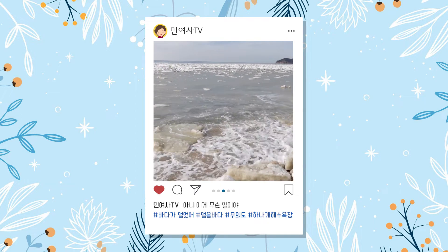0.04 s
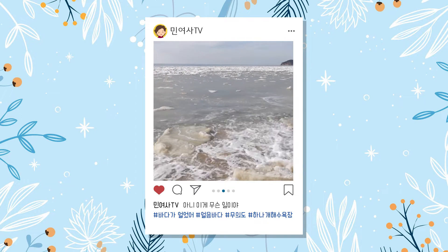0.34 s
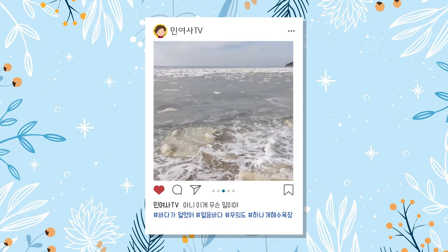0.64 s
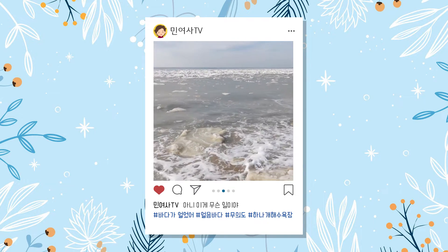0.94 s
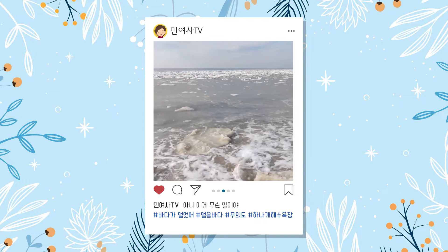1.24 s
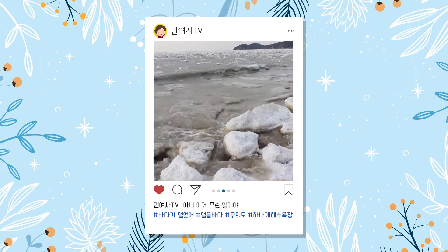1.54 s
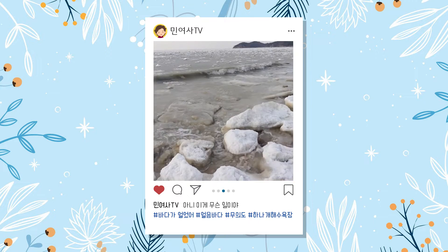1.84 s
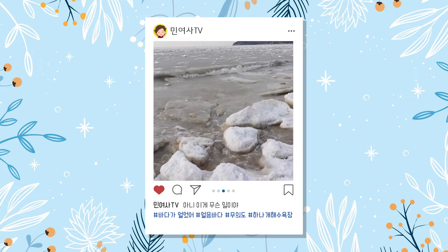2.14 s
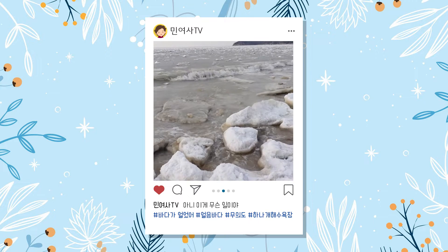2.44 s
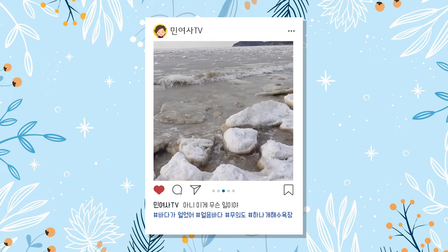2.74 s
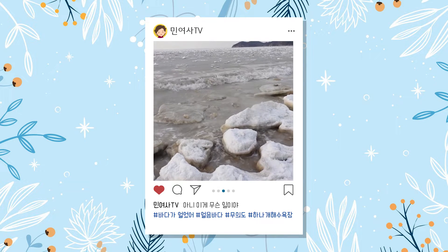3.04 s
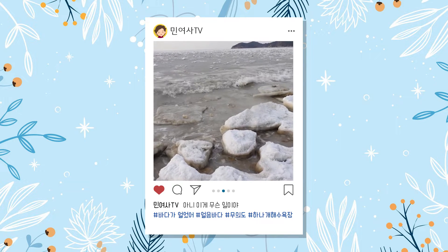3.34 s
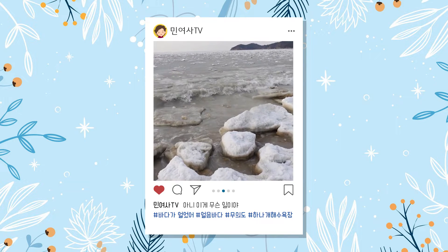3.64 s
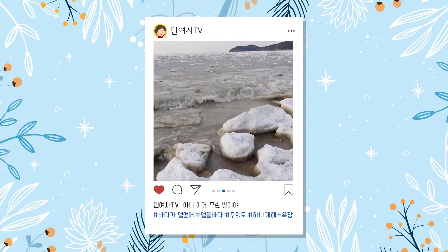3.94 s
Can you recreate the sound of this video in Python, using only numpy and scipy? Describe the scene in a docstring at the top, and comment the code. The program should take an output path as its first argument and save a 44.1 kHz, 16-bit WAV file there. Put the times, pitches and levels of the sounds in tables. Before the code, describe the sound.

Waves wash an icy shore, softly draining at first, then rushing loudly with splashes.

```python
"""An icy shore, heard from two spots. In the shallows a spent wave drains and fizzes away to the left;
then, beside ice-capped rocks, a new wave spills and rolls in, much louder.
Both are bands of rushing noise, from low churn to foam hiss, full of small ringing bubbles.
On top, splashes and spray flare up as grainy bursts, and pockets of trapped air gulp with a rising pitch."""
import sys
import numpy as np
from scipy import signal
from scipy.io import wavfile

SR = 44100
rng = np.random.default_rng(int(sys.argv[2]) if len(sys.argv) > 2 else 0)


def unload_wav(signal):
    """Save mono or channel-first audio to the path in sys.argv[1] as 16-bit WAV at rate SR, clipped to [-1, 1]."""
    wavfile.write(
        sys.argv[1],
        SR,
        np.round(np.clip(np.atleast_2d(signal).T, -1, 1) * 32767).astype(np.int16),
    )


N = 176400


def from_db(db):
    """Decibels to gain."""
    return 10 ** (np.asarray(db) / 20)


def unit_rms(x):
    """Scale to unit power."""
    return x / np.sqrt(np.mean(x ** 2) + 1e-20)


def at_hz(points, hz):
    """Read a curve on a log-frequency axis."""
    frequencies, values = np.transpose(points)
    return np.interp(np.log(hz), np.log(frequencies), values)


def drift(rate_hz, t):
    """A smooth random wobble of about unit size, drawn in 1 ms steps."""
    pole = np.exp(-2 * np.pi * rate_hz / 1000)
    slow = signal.lfilter([1], [1, -2 * pole, pole * pole], rng.standard_normal(6000))[1900:]
    return np.interp(t * 1000, np.arange(len(slow)), unit_rms(slow))


def band(x, low_hz, high_hz, order=2):
    """Band-pass filter."""
    sos = signal.butter(order, [low_hz, min(high_hz, .45 * SR)], "band", fs=SR, output="sos")
    return signal.sosfilt(sos, x)


def stereo(mid, side):
    """Left and right from mid and side."""
    return np.array([mid + side, mid - side])


def flare(t, attack_s, t60):
    """A straight attack, then a tail that falls 60 dB in t60 seconds."""
    return np.minimum(t / attack_s, 1) * from_db(-60 * np.maximum(t - attack_s, 0) / t60)


def drop_bursts(cues, attack_s, octaves, grain_db, side_db):
    """Clusters of drops: grainy noise around one pitch flares up and dies away."""
    out, t = np.zeros((2, N + SR)), np.arange(SR // 4) / SR
    half_band = 2 ** (octaves / 2)
    for time, db, hz, t60 in cues:
        grains = rng.standard_normal((2, len(t))) * from_db(grain_db * rng.standard_normal(len(t)))
        mid, side = unit_rms(band(grains, hz / half_band, hz * half_band))
        envelope = from_db(db) * flare(t, attack_s, t60)
        start = int(time * SR)
        out[:, start:start + len(t)] += envelope * stereo(mid, side * from_db(side_db))
    return out[:, :N]


def spray():
    """Sheets of fine spray hiss as the crest tips over."""
    # Sheets: (time [s], level [dB], pitch [Hz], decay [s])
    sheets = [(1.58, -41, 7000, 0.17), (1.692, -32, 5900, 0.22), (2.28, -36, 7450, .25)]
    return drop_bursts(sheets, attack_s=.034, octaves=.98, grain_db=6, side_db=-15)


def gulps(attack_s=.0053, rise_per_s=5):
    """Large pockets of trapped air ring briefly, rising in pitch as they near the surface."""
    # Air pockets: (time [s], level [dB], starting pitch [Hz], decay [s])
    pockets = [(1.086, -42, 280, 0.08), (1.637, -29, 720, 0.033), (1.748, -22, 720, 0.028),
               (2.25, -47, 115, 0.17), (2.519, -42, 270, .07), (2.656, -33, 258, 0.071),
               (2.69, -33, 206, 0.068), (3.243, -23, 680, 0.038)]
    out, t = np.zeros(N + SR), np.arange(SR // 4) / SR
    for time, db, hz, t60 in pockets:
        tone = np.sin(2 * np.pi * hz * t * (1 + rise_per_s * t / 2))
        start = int(time * SR)
        out[start:start + len(t)] += from_db(db) * flare(t, attack_s, t60) * tone
    return out[:N]


def splashes():
    """Single splashes throw up drops with a sharp attack."""
    # Splashes: (time [s], level [dB], pitch [Hz], decay [s])
    hits = [(.017, -44, 1200, .12), (.168, -31.5, 1550, 0.072), (.459, -34, 1950, .04),
            (.559, -37, 1460, 0.049), (1.517, -33, 3030, 0.068), (1.547, -38, 3000, 0.05),
            (2.006, -24, 1660, 0.057), (2.233, -24, 1900, .08), (2.503, -26.5, 1300, 0.094),
            (3.062, -28, 2700, .05), (3.706, -29, 2600, 0.076)]
    return drop_bursts(hits, attack_s=.0056, octaves=1.24, grain_db=2.5, side_db=-13)


def bubbles(low_hz, high_hz, per_s, width, length, ring_cycles=17, scatter_db=4):
    """Bubbles at three pitches in a band: each is born at random across the water and rings briefly."""
    out = np.zeros((2, length))
    for hz in np.geomspace(low_hz, high_hz, 7)[1::2]:
        born = rng.random(length) < per_s / (3 * SR)
        level_db = scatter_db * np.minimum(rng.exponential(1, length), 4)
        strength = born * from_db(level_db) * rng.choice([-1, 1], length)
        clicks = stereo(strength, strength * width * rng.standard_normal(length))
        pole = from_db(-60 * hz / (ring_cycles * SR))
        resonator = [1, -2 * pole * np.cos(2 * np.pi * hz / SR), pole * pole]
        out += signal.lfilter([1, 0, -1], resonator, clicks + 1e-18)
    return unit_rms(band(out, low_hz / 2, high_hz * 2))


def surf(t, flow, layers_hz, colour, width, pan, flicker_db, surge_db, bubble_db, bubbles_per_s, pan_depth):
    """Narrow bands of rushing water and bubbles, each swelling with its layers of the wave."""
    # Foam spreading sideways: (time [s], change of width [dB])
    foam_spread = [(0, -1), (.8, 2), (1.5, 2), (1.6, -1), (2.4, -3), (3.1, -3), (3.6, 0.5), (4, -0.5)]
    spread = from_db(np.interp(t, *np.transpose(foam_spread)))
    times, *levels = np.transpose(flow)
    # Flow gives each layer only its contour; colour sets the balance.
    swells = [unit_rms(from_db(np.interp(t, times, level))) for level in levels]
    edges_hz = np.r_[np.geomspace(25, 6400, 25), np.linspace(7400, 15900, 9)]
    noise = rng.standard_normal((2, 2, len(t)))
    surge = surge_db * drift(21, t)  # all bands wobble together
    out, power = 0, 0
    for k, (low, high) in enumerate(zip(edges_hz, edges_hz[1:])):
        hz = np.sqrt(low * high)
        mid, side = band(noise[k % 2], low, high, order=3)
        side_gain = spread * from_db(at_hz(width, hz))
        water = unit_rms(stereo(mid, side * side_gain))
        if 450 < hz < 11000:
            fizz = bubbles(low, high, bubbles_per_s * np.sqrt(hz / 1000), side_gain, len(t))
            water = unit_rms(water + from_db(bubble_db) * fizz)
        shares = [np.interp(np.log(hz), np.log(layers_hz), row) for row in np.eye(len(swells))]
        flicker = flicker_db * min(1, (900 / hz) ** 1.3) * drift(12.4, t)  # steadier in the treble
        envelope = np.dot(shares, swells) * from_db(surge + flicker)
        gain = from_db(at_hz(colour, hz)) * np.sqrt(high - low)
        balance = from_db(pan_depth * at_hz(pan, hz) * np.array([[.5], [-.5]]))
        out = out + gain * balance * envelope * water
        power += gain ** 2
    return out / np.sqrt(power)


def shallows(t, level_db=-39, drift_left_s=.8):
    """The spent wave drains away to the left, fizzing with bubbles."""
    # Ebb of the layers: (time [s], low churn [dB], wash [dB], foam hiss [dB])
    flow = [(0,-50.5,-34,-40),(.19,-56,-34.5,-41),(.27,-57,-37.5,-42.5),(.55,-55.5,-37,-42),(.8,-53.5,-40,-43),(1.15,-50.5,-40,-44),(1.5,-52.5,-41.5,-44.5)]
    # Those layers: (centre [Hz])
    layers_hz = [300, 1210, 7000]
    # Tone of the water: (frequency [Hz], relative density [dB])
    colour = [(30,-43),(55,-36),(100,-23),(170,-9),(270,-4),(450,-3),(850,-0.7),(1350,-1),(2600,-3.5),(4000,-6),(6400,-11.5),(10000,-19.5),(15500,-31)]
    # Base stereo width: (frequency [Hz], side minus mid [dB])
    width = [(60, -31), (100, -29), (180, -37), (310, -21), (550, -16), (950, -9.5), (1650, -8), (2860, -9),
             (4970, -7), (8640, -8), (15000, -4)]
    # Pan at full depth: (frequency [Hz], left minus right [dB])
    pan = [(200, -1), (700, 3), (2500, 4), (7000, 0.5), (15000, -.5)]
    water = surf(t, flow, layers_hz, colour, width, pan, flicker_db=.9, surge_db=.36,
                 bubble_db=-6, bubbles_per_s=240, pan_depth=np.minimum(t / drift_left_s, 1))
    return from_db(level_db) * water


def breaker(t, level_db=-25.5):
    """The new wave spills towards the rocks, its bubble cloud a dense roar."""
    # Swell of the layers: (time [s], low churn [dB], bubble cloud roar [dB], wash [dB], foam hiss [dB])
    flow = [(1.55,-56,-40.5,-35.5,-37),(1.7,-47,-37,-30,-36),(1.82,-51.5,-34,-29,-33),(2.0,-44.5,-33.5,-26.5,-31.5),(2.15,-45,-31,-25.5,-30.5),(2.3,-45,-29,-25,-28.5),(2.42,-44,-31,-25.5,-29),(2.58,-43,-29,-24.5,-29),(2.8,-41.5,-29,-26.5,-30),(2.95,-39.5,-27,-26,-29.5),(3.12,-39,-30.5,-24.5,-28),(3.3,-42,-28.5,-26.5,-29.5),(3.52,-46,-31,-29,-30),(3.7,-42.5,-31.5,-24.5,-30.5),(3.9,-45,-33,-27.5,-30),(4,-42,-32.5,-25.5,-28.5)]
    # Those layers: (centre [Hz])
    layers_hz = [230, 700, 2000, 8000]
    # Tone of the water: (frequency [Hz], relative density [dB])
    colour = [(30,-41),(55,-41),(100,-29.5),(190,-13),(280,-10),(400,-10),(600,-0.9),(780,1.5),(1100,-2),(1500,-2),(2100,-4),(3500,-5.5),(8200,-12),(11600,-19.5),(15500,-30)]
    # Base stereo width: (frequency [Hz], side minus mid [dB])
    width = [(60, -30), (92, -47), (140, -45), (210, -62), (330, -22), (500, -18.5), (770, -20),
             (1170, -11), (1790, -12.5), (2740, -12.5), (4190, -11), (6410, -13), (9810, -12.5),
             (15000, -6)]
    # Pan at full depth: (frequency [Hz], left minus right [dB])
    pan = [(200, 0.6), (1400, -0.9), (5000, -1), (14000, .6)]
    water = surf(t, flow, layers_hz, colour, width, pan, flicker_db=.93, surge_db=-.14,
                 bubble_db=-4.5, bubbles_per_s=260, pan_depth=.77)
    return from_db(level_db) * water


def scene():
    """A quick crossfade from the shallows to the rocks; splashes, spray and gulps lie on top."""
    cut_s, crossfade_s = 1.542, .008
    t = np.arange(N) / SR
    start = int(cut_s * SR)
    end = start + int(crossfade_s * SR)
    fade = np.clip((t - cut_s) / crossfade_s, 0, 1)
    sea = np.zeros((2, N))
    sea[:, :end] += shallows(t[:end]) * np.sqrt(1 - fade[:end])
    sea[:, start:] += breaker(t[start:]) * np.sqrt(fade[start:])
    return sea + splashes() + spray() + gulps()


def record(dry):
    """A steep low-pass takes off the very top."""
    cutoff_hz = 15850
    return signal.sosfilt(signal.ellip(12, .1, 80, cutoff_hz, fs=SR, output="sos"), dry)


dry = scene()
out = record(dry)
unload_wav(out)
```